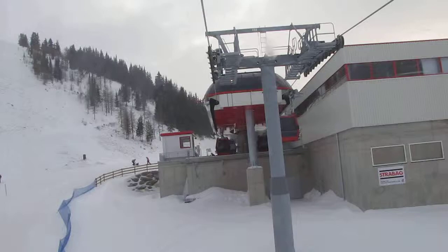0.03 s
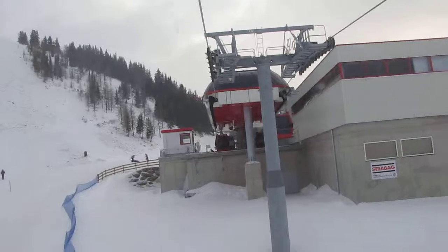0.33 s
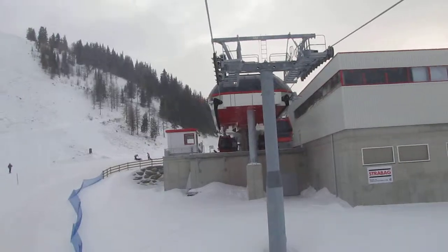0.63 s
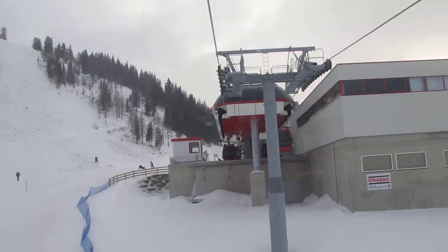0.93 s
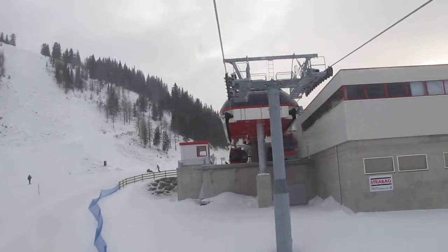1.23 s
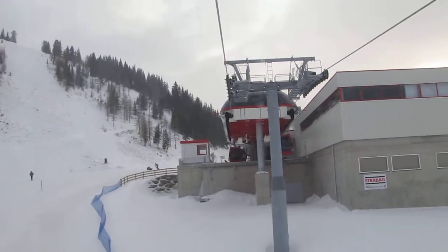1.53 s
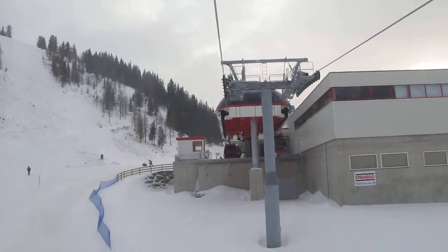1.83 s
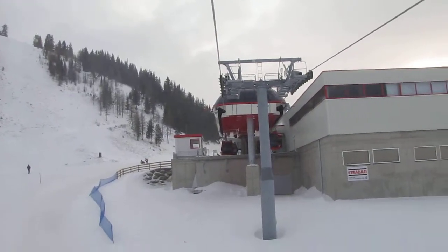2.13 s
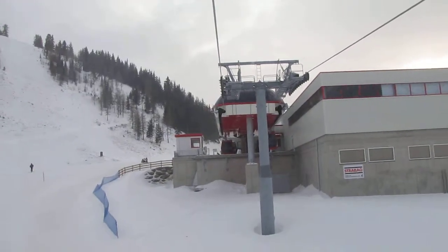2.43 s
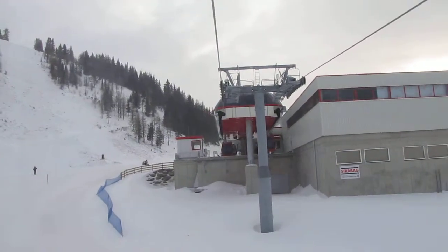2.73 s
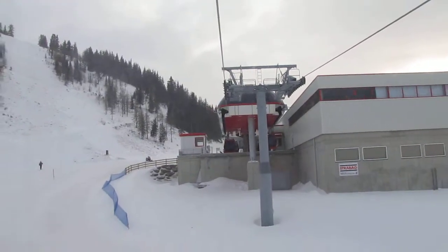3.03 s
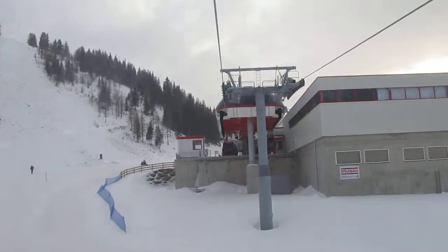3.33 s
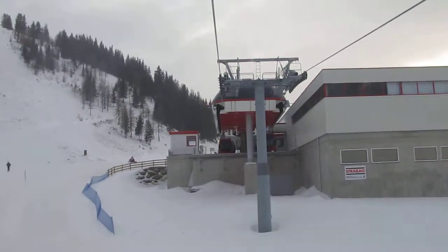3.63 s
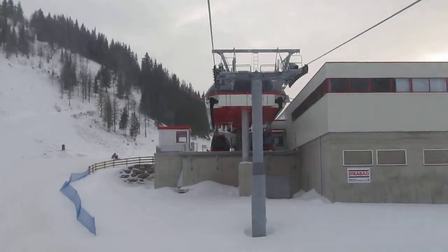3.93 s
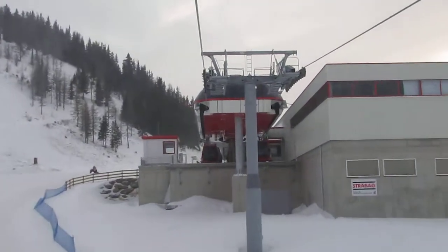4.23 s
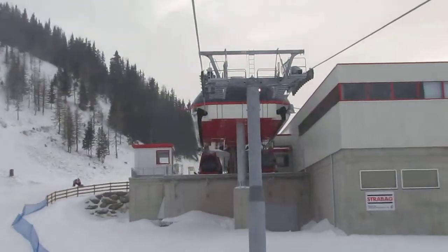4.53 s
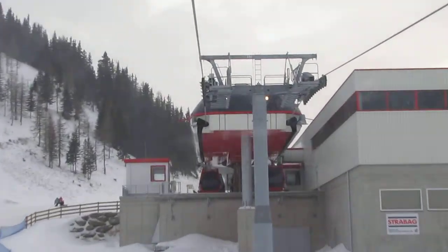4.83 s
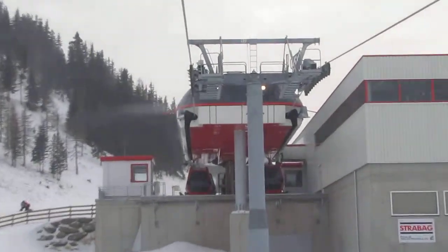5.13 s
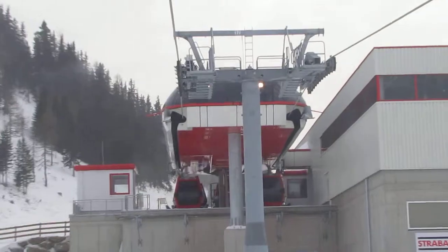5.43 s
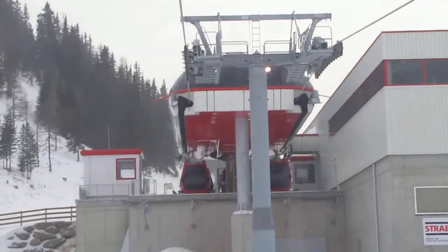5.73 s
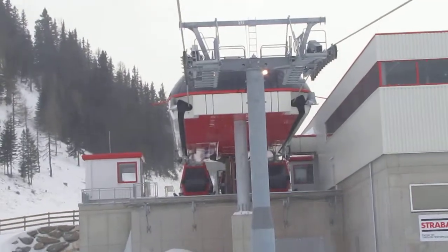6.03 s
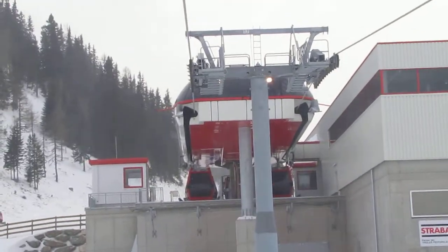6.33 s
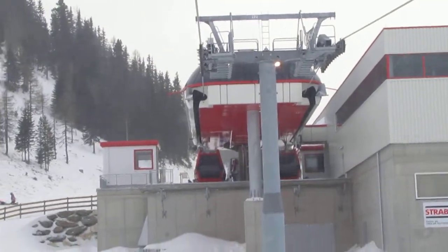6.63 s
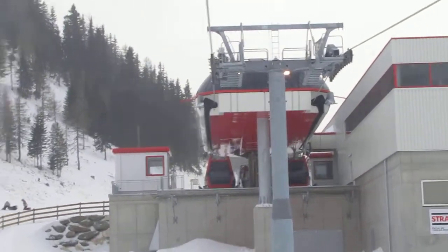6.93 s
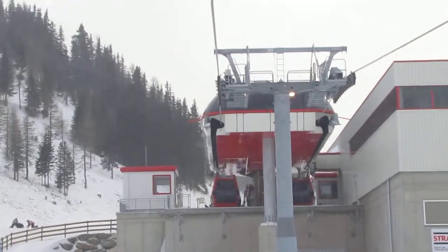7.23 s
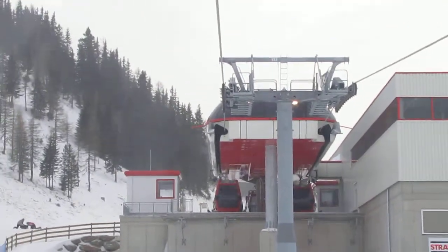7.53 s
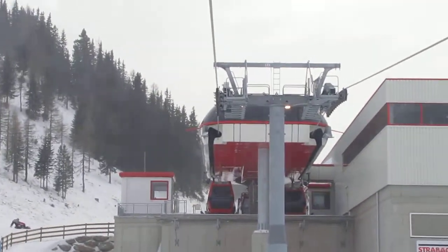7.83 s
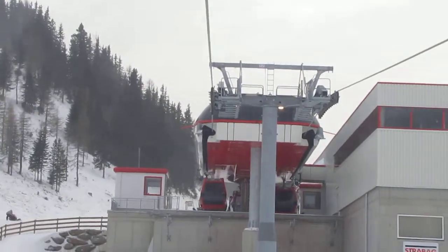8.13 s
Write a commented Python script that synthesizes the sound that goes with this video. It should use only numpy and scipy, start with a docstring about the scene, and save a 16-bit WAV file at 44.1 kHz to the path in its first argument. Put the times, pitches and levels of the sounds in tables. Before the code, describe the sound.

The sound is heard from inside a small cable car cabin. It opens with a quiet low rumble and hum, which swell between about 1.5 and 2.5 seconds as the cabin gathers speed. From then on a deep, throbbing hum dominates, joined by a hollow boom from the shell, uneven low buffeting and rolling noise. Softer air rushes along the windows over a faint hiss. Light panel clicks and ticks of small fittings come between 2 and 2.9 seconds, with another tick at 3.4. Dull knocks land at 5 and 5.5 seconds, followed by the sharpest clack at 5.6, slightly to the right, and a few small clicks until about 7.3. Very faint cloth rustles pass near 1.6, 3.9, 5.1 and 7.6 seconds. The hum and rumble continue steadily to the end, a little after 8 seconds.

```python
"""Cable car cabin leaving its station

The cabin picks up speed. The rope carries the drive's 59 Hz hum, which throbs against the rope's
own modes, and shakes the boomy shell. Low buffeting and rolling noise lie under the air rushing
along the windows. Panels knock, fittings tick and cloth rustles a few times over a faint hiss."""
import sys
import numpy as np
from scipy import signal
from scipy.io import wavfile

SR = 44100
rng = np.random.default_rng(int(sys.argv[2]) if len(sys.argv) > 2 else 0)


def unload_wav(signal):
    """Save mono or channel-first audio to the path in sys.argv[1] as 16-bit WAV at rate SR, clipped to [-1, 1]."""
    wavfile.write(
        sys.argv[1],
        SR,
        np.round(np.clip(np.atleast_2d(signal).T, -1, 1) * 32767).astype(np.int16),
    )


N = 365588

# Table levels are relative.
# drive tone, swelling as the cabin gathers speed: t/s, f/Hz, level/dB
DRIVE_TONE = [(0.07, 59.37, -29.0), (0.7, 59.32, -30.4), (1.3, 59.31, -31.2), (1.72, 60.0, -25.0),
              (1.85, 59.46, -16.5), (2.5, 59.4, -13.5), (3.4, 59.22, -13.6), (5.0, 59.43, -14.2),
              (6.5, 59.4, -13.7), (8.29, 59.51, -15.2)]
# close-set modes of the taut rope: f/Hz, level/dB
TAUT_ROPE_MODES = [(50.73, -40.4), (52.57, -31.8), (54.69, -29.4), (56.99, -26.3), (61.94, -30.4),
                   (64.02, -38.5)]
# boomy shell modes: f/Hz, width/Hz, level/dB
SHELL_MODES = [(109.5, 16.1, 1.5), (119.5, 7.7, -6), (157.4, 20.4, -7), (179.1, 18, -4),
               (196.8, 17.8, -7.5), (238, 23, -9), (268.2, 19, -7.5)]
# course of the ride: t/s, shaking level/dB, air level/dB
RIDE_LEVELS = [(0.07, -32.5, -52.9), (0.45, -35.5, -55.0), (1.0, -29, -49), (1.5, -27.5, -47),
               (2.0, -24.5, -43.5), (2.55, -26.95, -48.9), (2.9, -23.45, -44.5), (3.2, -22.5, -42.5),
               (3.6, -25.5, -46.6), (4.1, -24.5, -48), (4.4, -24.5, -43.5), (4.8, -24.5, -46),
               (5.4, -24, -44), (6.0, -24.5, -46), (6.6, -25.75, -48), (7.55, -23, -43.0),
               (8.0, -24.65, -44), (8.29, -22, -45.0)]
# buffeting of the cabin: t/s, level/dB
BUFFET_LEVELS = [(0.07, -38.5), (1.6, -36.5), (2.15, -27.5), (2.35, -32.8), (2.62, -27.5), (2.9, -32),
                 (3.6, -33), (3.8, -35.5), (4.35, -33.2), (4.6, -46), (4.9, -31), (5.6, -34), (6.0, -34.5),
                 (6.85, -36.5), (7.15, -30), (8.29, -32.5)]
# noise spectral densities: f/Hz, level/dB
BUFFET_SPECTRUM = [(12, -8.5), (18, -2), (24, -1), (32, -9), (42, -1.5), (60, -10), (85, -10), (130, -33)]
ROLL_SPECTRUM = [(80, 1.5), (140, 2.5), (250, 4), (330, 1), (430, -0.5), (530, -2), (640, -6.5),
                 (800, -6.5), (1050, -13), (1400, -17), (2200, -32), (4000, -52.5)]
AIR_SPECTRUM = [(700, -19), (1200, -0.5), (1700, -2), (2250, 2), (2700, -13.5), (3200, -10), (4000, -13.5),
                (5000, -16.5), (6000, -30.5), (7200, -23.5), (10000, -29.5), (15500, -40.5)]
RUSTLE_SPECTRUM = [(4000, 2), (8000, 0), (11000, -5), (15500, -6)]
HISS_SPECTRUM = [(1500, 0.5), (3500, -1.5), (6000, -3), (8000, -7), (11500, -13), (15500, -17)]
# stereo likeness of the noise: f/Hz, left-right correlation
NOISE_CORRELATION = [(60, 0.96), (150, 1), (300, .97), (550, 0.93), (1000, 0.78), (2000, 0.4), (4000, 0),
                     (8000, 0), (14000, 0.27)]
# stereo balance of the noise: f/Hz, left minus right/dB
NOISE_PAN = [(60, 3.5), (300, -0.5), (700, 0.5), (1300, 0), (2100, -2), (3300, 2), (5000, 0), (12000, -.5)]
# panel knocks: t/s, click level/dB, click cutoff/Hz, thud level/dB, left minus right/dB
PANEL_KNOCKS = [(1.9862, -22, 3000, -38, 0), (2.187, -26, 3000, -40, 0), (2.306, -25, 3000, -40, 0),
                (2.8061, -21.5, 4980, -25, 6), (2.8486, -26, 5010, -35, 6), (4.993, -28, 2000, -12.5, 4),
                (5.277, -22, 3000, -38, 0), (5.4995, -22, 4000, -8, 1), (5.5556, -21, 2996, -35, 2),
                (5.5763, -1.5, 6000, -18, -8.5), (5.655, -20, 4000, -24, -6), (5.7310, -20.5, 3000, -35, 1),
                (6.3256, -23, 4000, -29, -1)]
# panel modes: f/Hz, level/dB, t60/s
PANEL_MODES = [(833, -16.5, 0.03), (1070, -11.5, 0.02), (1690, -9.5, 0.0068), (1870, -11, 0.014),
               (2160, -14, 0.02), (2436, -10.5, 0.011), (2860, -19.5, 0.013), (3640, -17.5, 0.0059),
               (4580, -25.5, 0.009), (5820, -23.5, 0.0099), (8050, -28, .007), (9400, -28.5, 0.0091),
               (11050, -26, 0.0091), (12400, -24, .006)]
# ticks of small fittings: t/s, level/dB
FITTING_TICKS = [(1.9852, -32.5), (2.7251, -28.5), (2.7277, -39), (3.442, -33), (5.4995, -39), (5.657, -40),
                 (6.519, -47), (7.088, -43), (7.332, -45)]
# fitting modes: f/Hz, level/dB, t60/s
FITTING_MODES = [(2080, 0.5, 0.0095), (2960, -4.5, 0.0095), (4080, -4, 0.01), (4900, -8.5, 0.005),
                 (5820, -14, 0.0041), (7260, -15.5, 0.0043), (9800, -18, .006), (12600, -24, .005)]
# cloth rustles: peak t/s, length/s, level/dB
RUSTLE_SWELLS = [(1.64, 0.12, -58.5), (3.92, 0.11, -59), (5.14, .07, -58), (7.627, 0.18, -56)]

TIME_S = np.arange(N) / SR


def from_db(db):
    """Decibels to gain."""
    return 10 ** (np.asarray(db) / 20)


def unit_rms(x):
    """Scale to rms 1."""
    return x / np.sqrt(np.mean(x ** 2) + 1e-20)


def in_time(rows):
    """Each value column of a time table, per sample."""
    times_s, *columns = np.transpose(rows)
    return [np.interp(TIME_S, times_s, column) for column in columns]


def at_hz(rows, hz):
    """Interpolate a table over log frequency."""
    freqs_hz, values = np.transpose(rows)
    return np.interp(np.log(hz), np.log(freqs_hz), values)


def pan(lean_db):
    """Stereo gains for a left-minus-right level."""
    return from_db(np.array([[.5], [-.5]]) * lean_db)


def drift(rate_hz):
    """Slow random wander, rms about 1."""
    hop, settle = 40, 2000
    pole = np.exp(-2 * np.pi * rate_hz * hop / SR)
    white = rng.standard_normal(N // hop + settle + 2)
    slow = signal.lfilter([1], [1, -2 * pole, pole * pole], white)[settle:]
    return np.interp(np.arange(N) / hop, np.arange(len(slow)), unit_rms(slow))


def band(x, low_hz, high_hz):
    """Butterworth band-pass."""
    sos = signal.butter(2, [low_hz, min(high_hz, .48 * SR)], "band", fs=SR, output="sos")
    return signal.sosfilt(sos, x)


def stereo_noise(spectrum, flicker_db):
    """Third-octave noise bands, each with its own flicker, pan and correlation; total rms 1."""
    edges_hz = 11 * 2 ** (np.arange(33) / 3)
    noise, white = np.zeros((2, N)), rng.standard_normal((2, 2, N))
    for k, (low_hz, high_hz) in enumerate(zip(edges_hz, edges_hz[1:])):
        hz = np.sqrt(low_hz * high_hz)
        if spectrum[0][0] <= hz <= spectrum[-1][0]:
            mid, side = band(white[k % 2], low_hz, high_hz)
            correlation = np.clip(at_hz(NOISE_CORRELATION, hz), -1, .998)
            pair = np.sqrt(1 + correlation) * mid + np.sqrt(1 - correlation) * side * [[1], [-1]]
            level_db = at_hz(spectrum, hz) + flicker_db * drift(rate_hz=12)
            noise += pair * pan(at_hz(NOISE_PAN, hz)) * from_db(level_db)
    return unit_rms(noise)


def struck(force, modes):
    """Blows ring a body's modes as decaying sines, neighbours in opposite polarity."""
    sound = np.zeros_like(force)
    for k, (hz, db, t60_s) in enumerate(modes):
        radius, angle = np.exp(-np.log(1000) / (t60_s * SR)), 2 * np.pi * hz / SR
        feedback = [1, -2 * radius * np.cos(angle), radius ** 2]
        sound += (-1) ** k * from_db(db) * signal.lfilter([0, np.sin(angle)], feedback, force + 1e-18)
    return sound


def with_reflections(x, wet_db, t60_s, cutoff_hz):
    """Close walls add short, dense, dull echoes, different on each side."""
    delay_s = np.arange(SR // 10) / SR
    decay = np.exp(-np.log(1000) * delay_s / t60_s) * (delay_s > .001)
    echoes = rng.standard_normal((2, len(delay_s))) * decay
    echoes = signal.sosfilt(signal.butter(1, cutoff_hz, fs=SR, output="sos"), echoes)
    echoes /= np.sqrt(np.sum(echoes ** 2, axis=1, keepdims=True))
    return x + from_db(wet_db) * signal.fftconvolve(x, echoes, axes=1)[:, :N]


def rope_hum(in_phase_s=4.05, rise_s=2.8, waver_db=.5, octave_db=-16):
    """The drive's near-pure tone throbs as the rope's modes move in and out of phase with it."""
    drive_hz, drive_db = in_time(DRIVE_TONE)
    cycles = np.cumsum(drive_hz) / SR
    cycles -= np.interp(in_phase_s, TIME_S, cycles)
    drive = from_db(drive_db + waver_db * drift(rate_hz=11)) * np.cos(2 * np.pi * cycles)
    rope = sum(from_db(db) * np.cos(2 * np.pi * hz * (TIME_S - in_phase_s))
               for hz, db in TAUT_ROPE_MODES)
    rope_db = np.interp(TIME_S, [0, rise_s], [-11.5, 1])
    hum = np.sqrt(2) * (drive + from_db(rope_db) * rope)
    octave = band(hum ** 2, 90, 140)  # the shell gives more one way than the other
    return hum + from_db(octave_db) * octave


def shell_boom(level_db):
    """Random shaking rings the shell's modes."""
    boom = sum(from_db(db) * band(rng.standard_normal(N), hz - width_hz / 2, hz + width_hz / 2)
               for hz, width_hz, db in SHELL_MODES)
    return from_db(level_db) * unit_rms(boom)


def buffeting(gain_db=4.5):
    """Slow buffeting of the whole cabin: a deep, uneven rumble."""
    level_db, = in_time(BUFFET_LEVELS)
    return from_db(level_db + gain_db) * stereo_noise(BUFFET_SPECTRUM, flicker_db=2.5)


def rolling(level_db):
    """Low-mid rolling noise, driven by the shaking."""
    return from_db(level_db) * stereo_noise(ROLL_SPECTRUM, flicker_db=1.3)


def air_rush(level_db):
    """Air rushes along the windows."""
    return from_db(level_db) * stereo_noise(AIR_SPECTRUM, flicker_db=1.38)


def panel_knocks(thud_s=0.00062):
    """Panels shift against their frame: a click, duller for softer contact, and a low-mode thud."""
    force, age = np.zeros((2, N)), np.arange(SR // 100)
    push = np.sin(np.pi * np.minimum(age / (thud_s * SR), 1)) ** 2
    for onset_s, click_db, cutoff_hz, thud_db, lean_db in PANEL_KNOCKS:
        pole = np.exp(-2 * np.pi * cutoff_hz / SR)
        click = from_db(click_db) * (1 - pole) * pole ** age
        thud = from_db(thud_db) * push / push.sum()
        start = round(onset_s * SR)
        force[:, start:start + len(age)] += pan(lean_db) * (click + thud)
    return with_reflections(struck(force, PANEL_MODES), wet_db=-10, t60_s=0.05, cutoff_hz=4000)


def fitting_ticks(snap_db=20):
    """Small hard fittings snap as the cabin flexes, and ring briefly."""
    force = np.zeros((2, N))
    for onset_s, db in FITTING_TICKS:
        force[:, round(onset_s * SR)] += from_db(db)
    snap = from_db(snap_db) * band(force + 1e-18, low_hz=4170, high_hz=6500)
    ringing = struck(force, FITTING_MODES)
    return with_reflections(ringing + snap, wet_db=-3.5, t60_s=0.023, cutoff_hz=7000)


def cloth_rustles():
    """Cloth brushes past: short, bright swells of noise."""
    swells = sum(from_db(db) * np.exp(-2 * ((TIME_S - peak_s) / length_s) ** 2)
                 for peak_s, length_s, db in RUSTLE_SWELLS)
    return swells * stereo_noise(RUSTLE_SPECTRUM, flicker_db=1.0)


def hiss(level_db=-60):
    """Faint, flickering treble noise."""
    return from_db(level_db) * stereo_noise(HISS_SPECTRUM, flicker_db=2.0)


def scene():
    """Hum and boom fill the cabin; one shaking curve drives both boom and rolling noise."""
    shake_db, air_db = in_time(RIDE_LEVELS)
    body = (rope_hum() + shell_boom(shake_db - 0.5)) * pan(lean_db=0.94)
    noise = buffeting() + rolling(shake_db - 6) + air_rush(air_db + 0.5) + hiss()
    return body + noise + panel_knocks() + fitting_ticks() + cloth_rustles()


def record(dry, start_s=.072, fade_s=.003, cutoff_hz=15750):
    """Brief silence, fast fade-in, peak limit at full scale, steep low-pass."""
    fade_in = np.clip((TIME_S - start_s) / fade_s, 0, 1)
    lowpass = signal.ellip(10, .1, 80, cutoff_hz, fs=SR, output="sos")
    return signal.sosfilt(lowpass, np.clip(dry * fade_in, -1, 1))


dry = scene()
out = record(dry)
unload_wav(out)
```